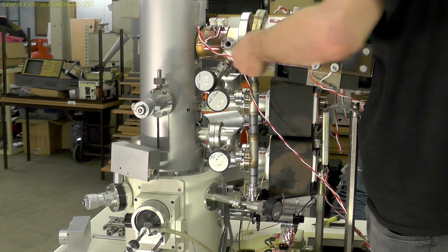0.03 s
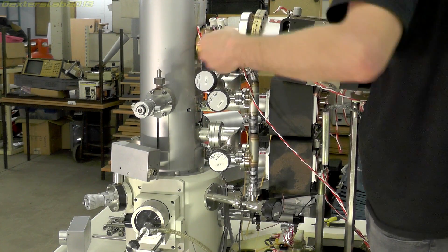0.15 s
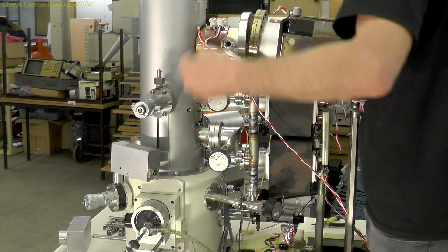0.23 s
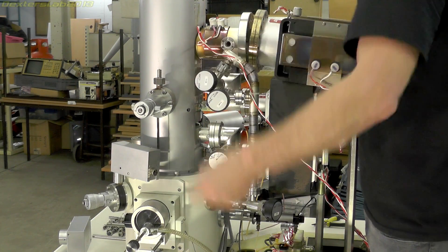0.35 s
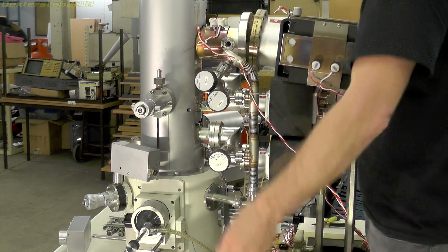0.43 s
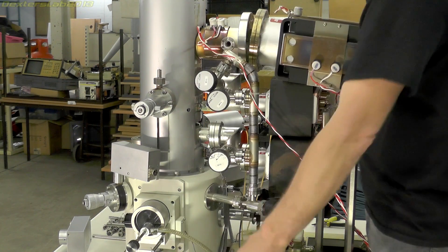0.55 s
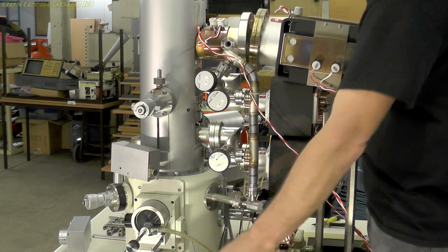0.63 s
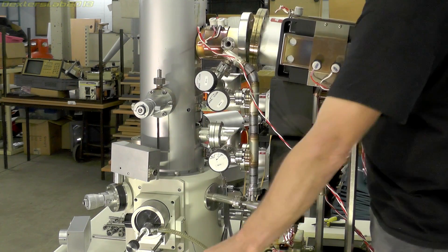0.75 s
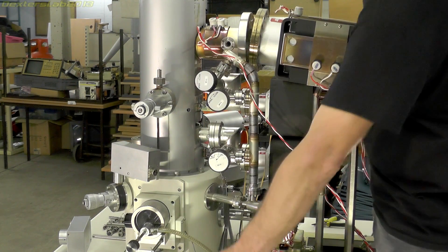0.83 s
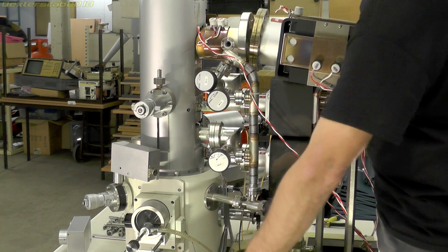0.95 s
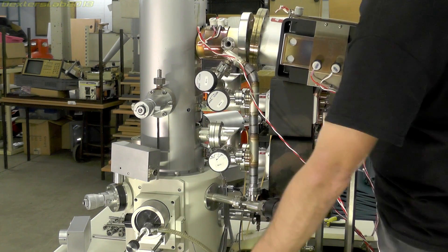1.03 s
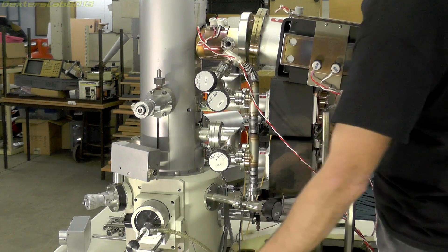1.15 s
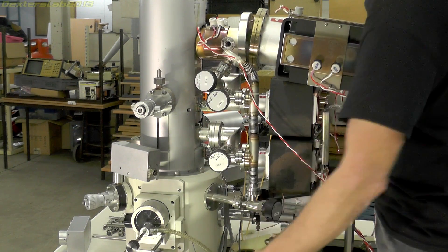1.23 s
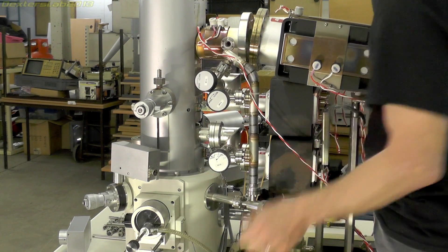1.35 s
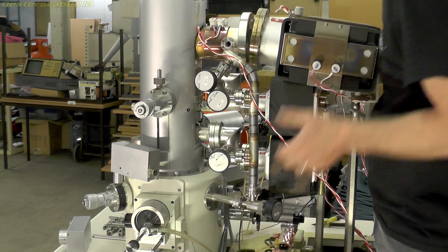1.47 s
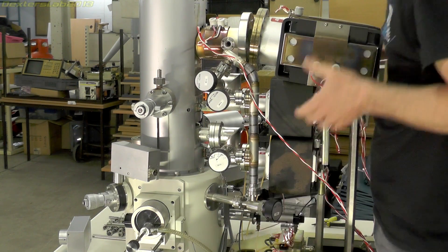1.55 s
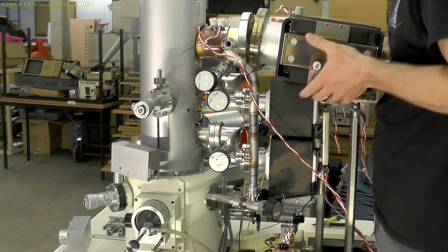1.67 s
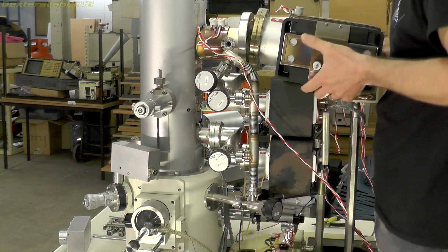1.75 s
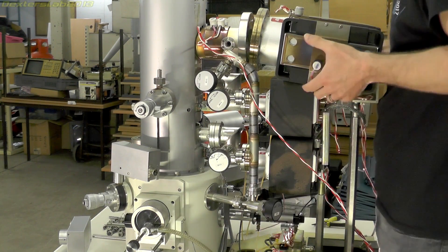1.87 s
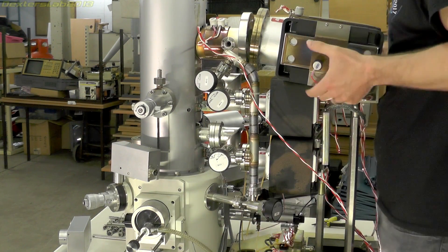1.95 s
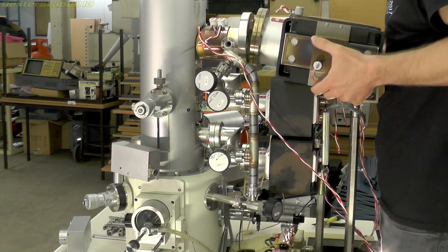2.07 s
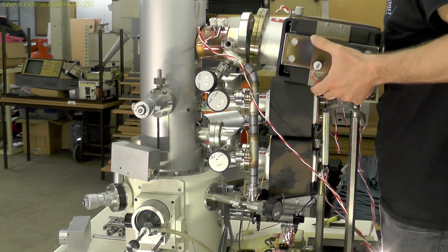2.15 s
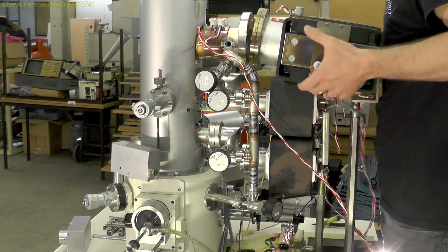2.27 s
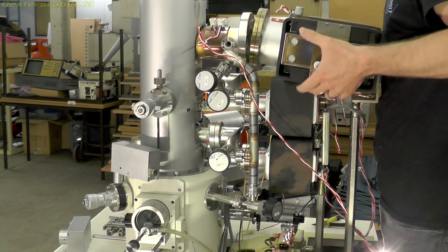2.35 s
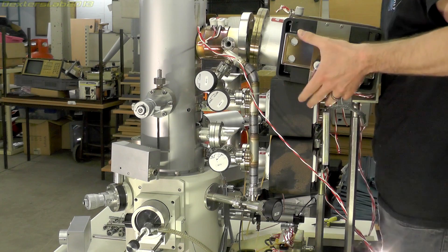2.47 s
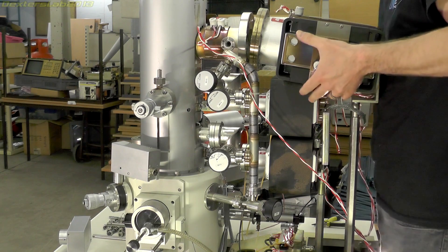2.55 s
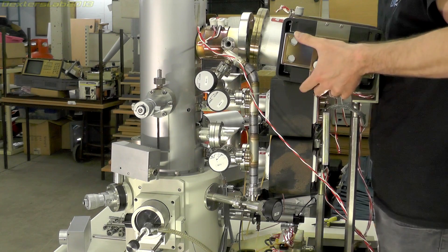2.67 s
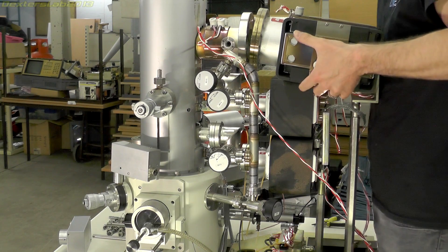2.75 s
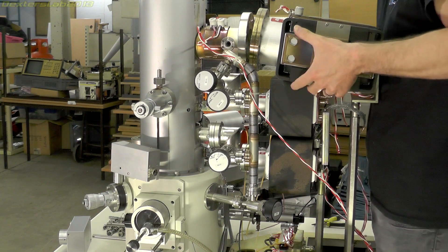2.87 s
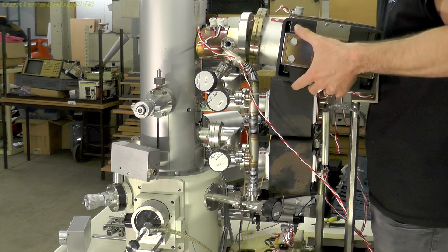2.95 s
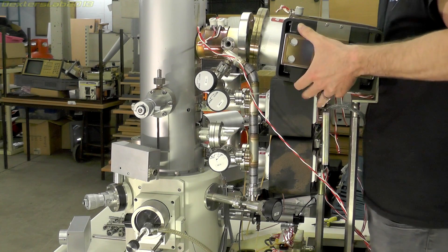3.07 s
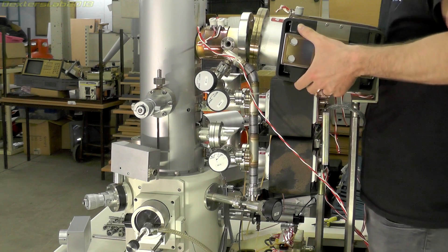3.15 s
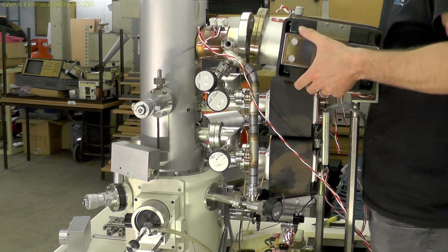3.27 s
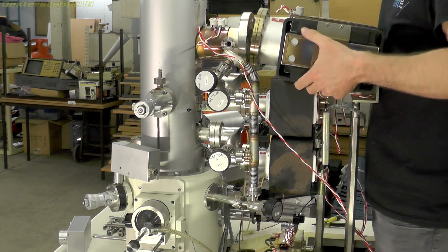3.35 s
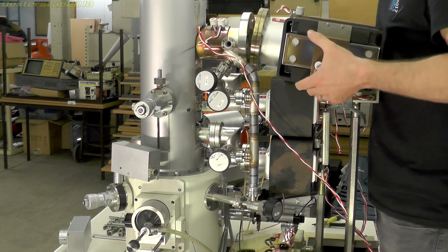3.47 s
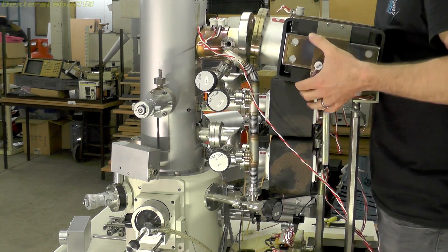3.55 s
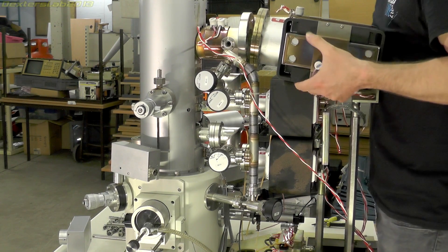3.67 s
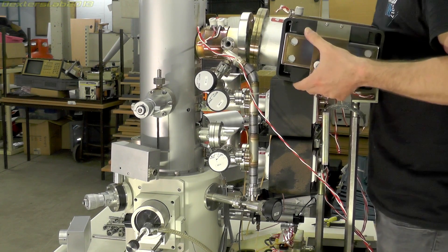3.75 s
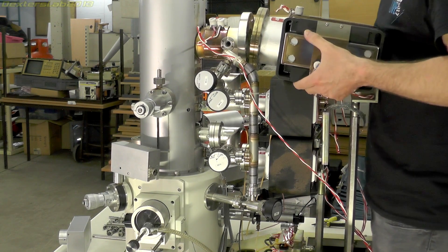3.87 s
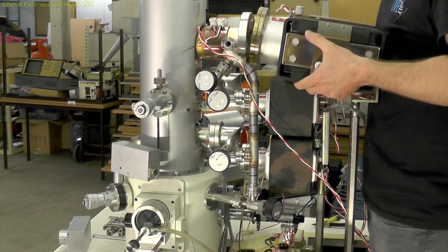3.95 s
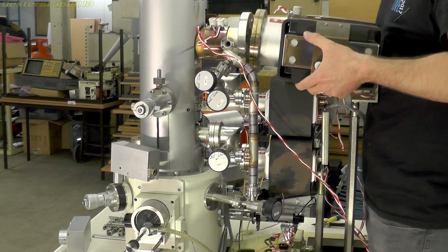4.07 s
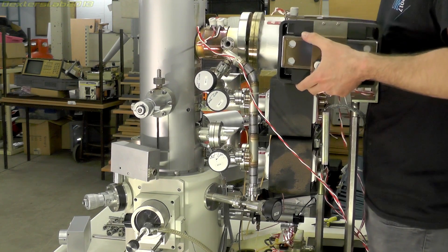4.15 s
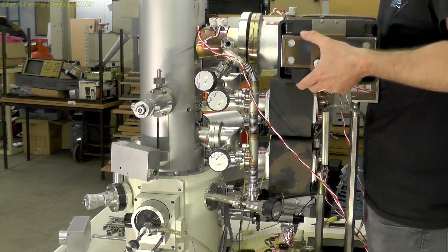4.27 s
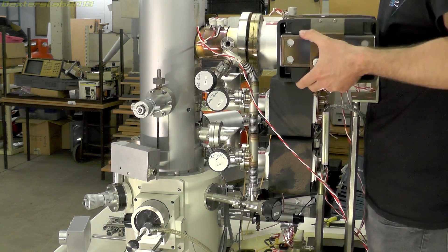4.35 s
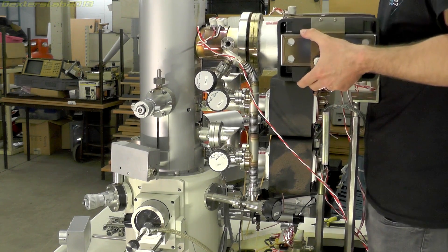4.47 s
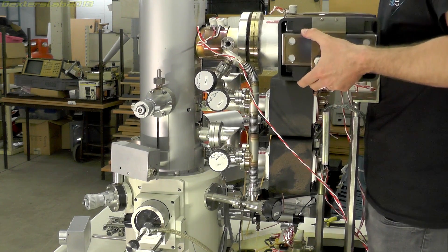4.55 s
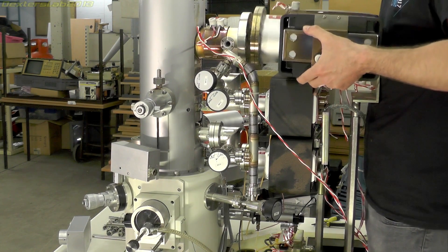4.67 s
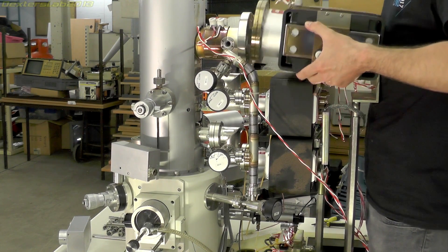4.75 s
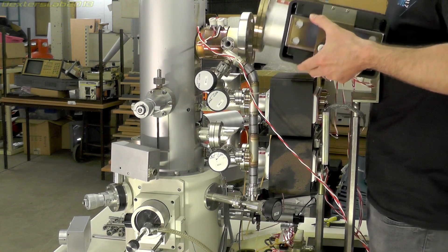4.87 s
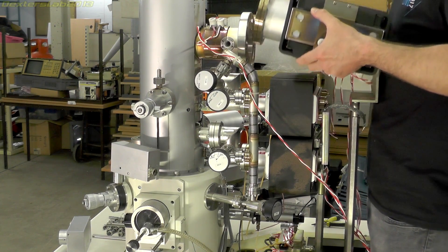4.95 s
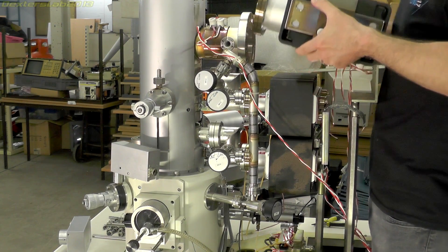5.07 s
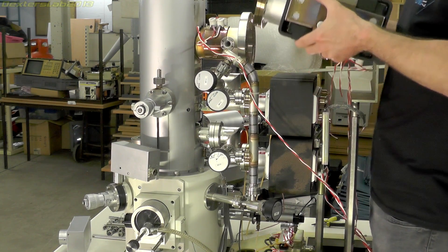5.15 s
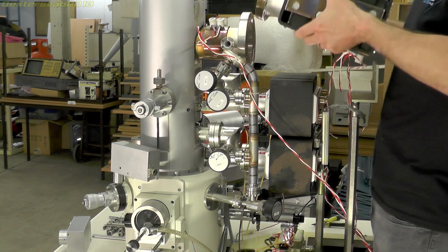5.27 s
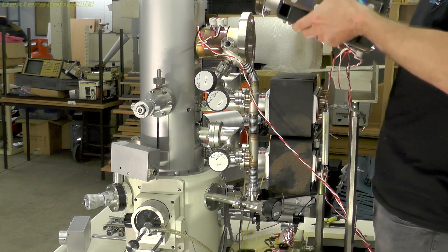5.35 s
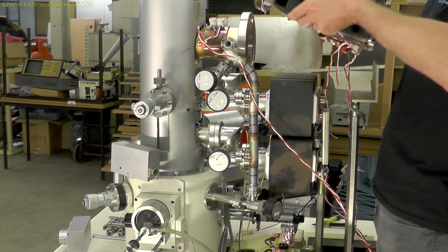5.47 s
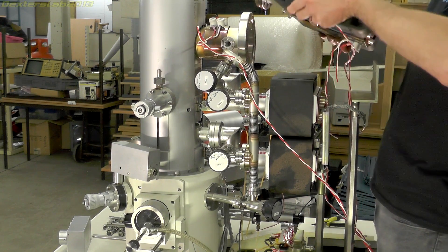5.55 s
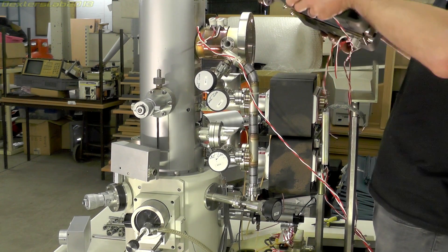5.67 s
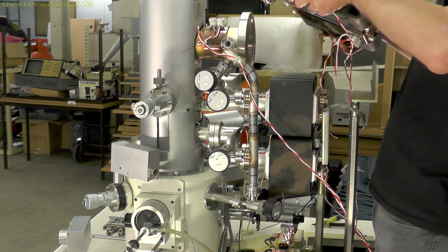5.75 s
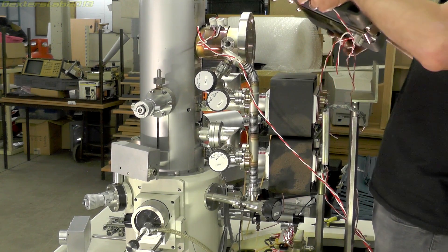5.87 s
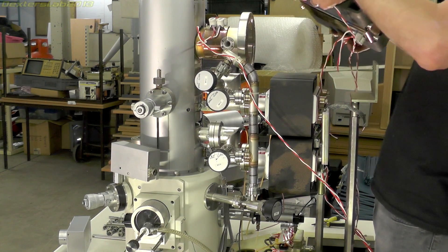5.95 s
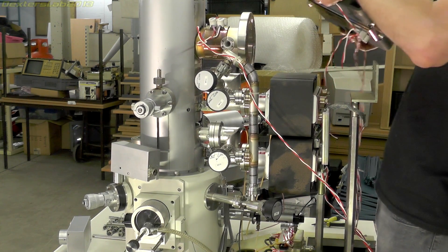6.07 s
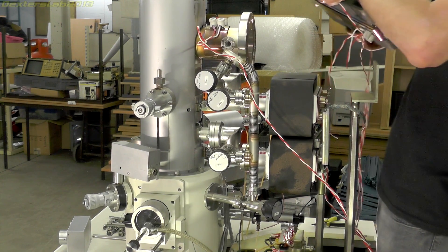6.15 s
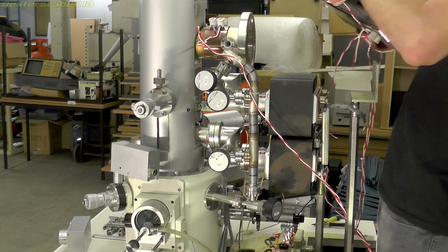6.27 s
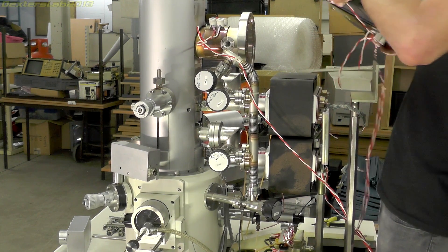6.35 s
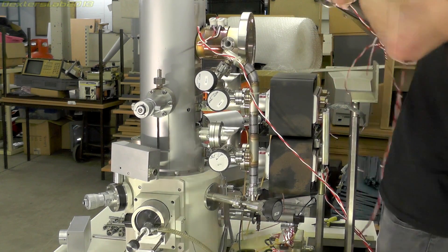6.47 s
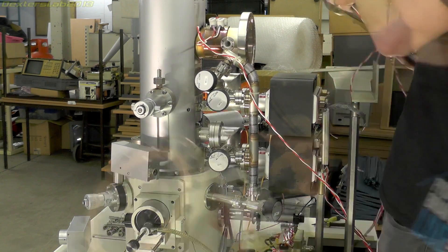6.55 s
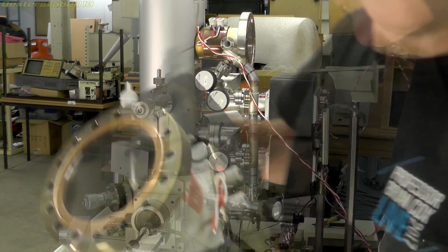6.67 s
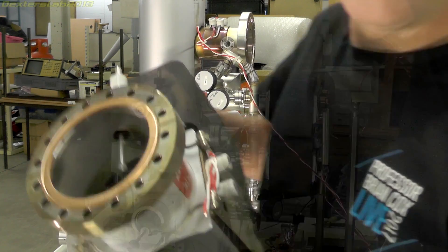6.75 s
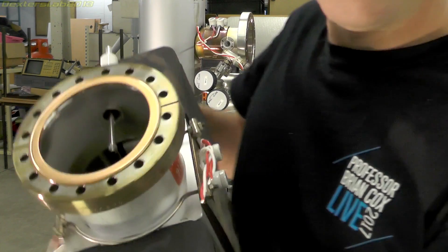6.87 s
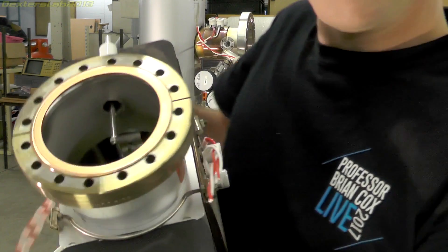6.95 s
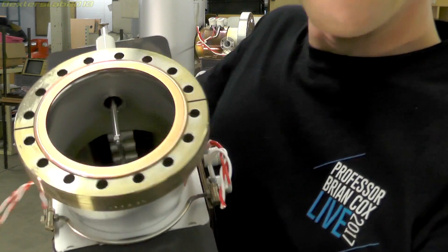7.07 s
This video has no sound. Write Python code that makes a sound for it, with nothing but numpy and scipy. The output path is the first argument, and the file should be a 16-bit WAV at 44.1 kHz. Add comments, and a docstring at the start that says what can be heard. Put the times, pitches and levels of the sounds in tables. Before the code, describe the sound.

A steel tool drops and rattles in rapid, weakening bounces. Quiet intermittent ticks, rubs and cloth rustles follow while heavy metal is worked loose. A sudden hard clang with dull quick knocks frees it, a small loose part pings very high several times, then a sharp clack rings thinly. Soft fan rumble and a roughly one-second hall tail surround everything, captured by one microphone.

```python
"""Large workshop, one microphone: a heavy steel vacuum pump is taken off an instrument over hum and
ventilation. First the fading ring of an earlier clink and a soft footfall; then a spanner clatters down, as
cracks and ringing modes. The pump ticks and scrapes as it is rocked: brief contacts and friction noise. Its
flange comes free with a clang and a judder, also struck modes, and a small loose steel part pings in one high
mode. Near the end a fitting drops with a sharp clack and rings thinly, and a few more ticks follow."""
import sys
import numpy as np
from scipy import signal
from scipy.fft import rfft, irfft, next_fast_len
from scipy.io import wavfile
from scipy.ndimage import uniform_filter1d

SR = 44100
rng = np.random.default_rng(int(sys.argv[2]) if len(sys.argv) > 2 else 0)


def wrap_up_sound(samples):
    """Save the sound to the file named by the first command line argument, as 16-bit audio."""
    columns = np.atleast_2d(samples).T
    # keep every value between -1 and 1, then stretch to whole-number steps
    tamed = np.clip(columns, -1, 1)
    steps = np.round(tamed * 32767).astype(np.int16)
    wavfile.write(sys.argv[1], SR, steps)


N = 313551  # length in samples

# The pump flange knocking on its seat. Each row: start in seconds, relative level in dB, tilt in dB per octave.
FLANGE_HITS = [(4.9895, -12, -1.5), (4.9985, -18, 1.5), (5.001, -14, 2), (5.125, -27, 5),
               (5.1487, -20.5, 1.5)]
# Colour of its crack. Each row: frequency in Hz, relative density in dB per Hz.
FLANGE_SPECTRUM = [(90, -47.5), (180, -40), (255, -11.5), (320, -6), (400, -4.5), (540, -2.5), (650, -3),
                   (790, -1.5), (920, -10.5), (1100, 3), (1450, 0), (2000, -2.5), (3100, -8.5),
                   (4600, -23.5), (6500, -29), (11000, -28.5), (15500, -41)]
# Its strong modes. Each row: frequency in Hz, relative level in dB, 60 dB decay time in seconds.
FLANGE_MODES = [(114.9, -39, 0.88), (259.2, -26, .3), (283.3, -27, 0.44), (323.5, -23, 0.24),
                (444, -24, 0.23), (550, -24.5, 0.4), (826, -10.5, 0.099), (922, -1.5, 0.042),
                (1423, -14, 0.12), (1860, -30, 0.055)]
# the freed pump judders in dull, evenly spaced knocks that die away
JUDDER_START_S, JUDDER_GAP_S, JUDDER_TILT_DB_PER_OCTAVE = 5.026, .051, -13.5
JUDDER_RELATIVE_DB, JUDDER_FADE_DB_PER_S = -25.5, 15.5


def flange_clang(hall):
    """Hard knocks and a fading judder excite the heavy flange's modes."""
    hits = list(FLANGE_HITS)
    for delay in JUDDER_GAP_S * np.arange(7):
        level_db = JUDDER_RELATIVE_DB - JUDDER_FADE_DB_PER_S * delay
        hits.append((JUDDER_START_S + delay, level_db, JUDDER_TILT_DB_PER_OCTAVE))
    return blows(hits, FLANGE_SPECTRUM, FLANGE_MODES, hall, crack_t60=0.045, crack_db=-2.5,
                 crack_wet_db=-2.0, modes_db=-2.5, modes_wet_db=-5.0)


# The spanner bouncing to rest, first end down.
# Each row: start in seconds, relative level in dB, treble tilt in dB per octave.
SPANNER_HITS = [(1.1064, -19, -2), (1.121, -12.5, 0.5), (1.194, -22, -2), (1.2192, -17.5, -2),
                (1.2643, -22.5, -3.5), (1.294, -19.5, 0), (1.326, -24.5, -2), (1.355, -21.5, -1),
                (1.4041, -22, 1), (1.4375, -23.5, -1.5), (1.461, -26.5, -0.5), (1.496, -26, -1)]
# Its crowd of short modes. Each row: frequency in Hz, relative density in dB per Hz.
SPANNER_SPECTRUM = [(140, -43), (200, -11), (300, -16), (700, -11.5), (1100, -7), (1900, -5), (3000, -2.5),
                    (3800, -3.5), (5200, -10.5), (6700, -27), (8800, -15), (11000, -22.5), (15500, -34)]
# Its strong modes. Each row: frequency in Hz, relative level in dB, 60 dB decay time in seconds.
SPANNER_MODES = [(1067, -22.5, 0.11), (1817, 4, 0.014), (1830, -21, 0.42), (2154, -7, 0.042),
                 (2584, -8.5, 0.037), (3430, -16, 0.18), (3460, -3.5, 0.038), (3890, -17, 0.081),
                 (4220, -19, 0.1)]
# its other end lands a moment later, softer and duller
REBOUND_MEAN_S, REBOUND_LOSS_DB, REBOUND_DULL_DB_PER_OCTAVE = .0115, 3.5, 2


def spanner_clatter(hall):
    """At every bounce one end lands and the other follows, both ringing the spanner's modes."""
    hits = list(SPANNER_HITS)
    for s, db, tilt_db in SPANNER_HITS:
        second_s = s + REBOUND_MEAN_S * rng.uniform(.85, 1.15)
        hits.append((second_s, db - REBOUND_LOSS_DB, tilt_db - REBOUND_DULL_DB_PER_OCTAVE))
    return blows(hits, SPANNER_SPECTRUM, SPANNER_MODES, hall, crack_t60=0.051, crack_db=-6,
                 crack_wet_db=-3.5, modes_db=-4.0, modes_wet_db=-7)


# The fitting dropping and settling.
# Each row: start in seconds, relative level in dB, treble tilt in dB per octave.
FITTING_HITS = [(6.114, -36.5, -6.5), (6.121, -16, 3), (6.1225, -18, -2.1), (6.49, -34.5, -3),
                (6.4935, -39, 7.5)]
# Colour of its crack. Each row: frequency in Hz, relative density in dB per Hz.
FITTING_SPECTRUM = [(180, -18), (350, -8.5), (580, -2), (900, -2.5), (1300, 0), (1850, 1), (2700, -3),
                    (3900, 1.5), (5200, -3), (6800, -14.5), (11000, -9.5), (15500, -19.5)]
# Its strong modes. Each row: frequency in Hz, relative level in dB, 60 dB decay time in seconds.
FITTING_MODES = [(1450, -11, 0.18), (1730, 0.5, 0.068), (2090, 8, 0.015), (3940, -23, 0.48),
                 (4200, -34, 0.82), (4800, -36, 0.37), (8560, -22, 0.11), (11400, -16.5, 0.081)]


def fitting_drop(hall):
    """The falling fitting clacks and rings its own modes."""
    return blows(FITTING_HITS, FITTING_SPECTRUM, FITTING_MODES, hall, crack_t60=0.031, crack_db=-2.0,
                 crack_wet_db=-2.0, modes_db=-7.0, modes_wet_db=-20)


def fitting_shimmer(level_db, centre_hz, spread_hz, t60, count):
    """The fitting's thin wall rings on in a cluster of close modes after its hardest blow."""
    out = np.zeros(N)
    hardest_s = max(FITTING_HITS, key=lambda hit: hit[1])[0]
    mode_gain = from_db(level_db) / np.sqrt(count)
    for offset in np.linspace(-1, 1, count) + rng.standard_normal(count) / count:
        sign = rng.choice([-1, 1])
        add(out, hardest_s, sign * mode_gain * ring(centre_hz + spread_hz * offset, t60))
    return out


# Small loose steel part touching its neighbour. Each row: start in seconds, ring level in dB.
PINGS = [(5.001, -33), (5.152, -41.5), (5.187, -37.5), (5.5172, -21), (5.599, -20.5), (5.652, -30),
         (5.6836, -21.5), (5.708, -20.5), (5.755, -24.5)]
PING_HZ, PING_T60_S = 7728, 0.29
PING_CLICK_DB = -9.5  # contact click against the ring
PING_JOLT_DB = -22  # ring set off by a spanner blow, against that blow


def pings(hall, click_t60):
    """The small part's one high mode rings at each touch, with a faint click; the bouncing spanner jolts it too."""
    swing, clicks = np.zeros((2, N))
    decay = fade(clock(), PING_T60_S)
    click_spectrum = [(2000, -11), (4000, -8.5), (9000, -1.0), (12500, -1), (15500, -15.5)]
    jolts = [(s, db + PING_JOLT_DB) for s, db, _ in SPANNER_HITS]
    for s, db in list(PINGS) + jolts:
        start = round(s * SR)
        # a new touch shows only where it exceeds the ring still sounding
        swing[start:] = np.maximum(swing[start:], from_db(db) * decay[:N - start])
        add(clicks, s, from_db(db + PING_CLICK_DB) * crack(click_spectrum, click_t60))
    phase = 2 * np.pi * PING_HZ * clock() + .25 * drift(60)
    tone = uniform_filter1d(swing, size=70) * np.sin(phase)
    return in_hall(tone, hall, wet_db=-9.5) + in_hall(clicks, hall, wet_db=-3)


# Clearest ticks as the pump is gripped and rocked.
# Each row: start in seconds, level in dB, treble tilt in dB per octave, ring frequency in Hz.
TICKS = [(0.78, -60, 0, 2120), (1.735, -39.5, 1, 1547), (1.978, -53.5, 0.5, 1560),
         (2.325, -43.5, 15.5, 12500), (2.33, -48.5, -3, 597), (2.353, -50.5, 17, 12950),
         (2.375, -44.5, 4.5, 1900), (2.396, -50.5, 4, 2020), (2.644, -42, 1, 3450), (2.65, -41, -0.5, 1900),
         (3.046, -49, 1, 1405), (3.144, -53, 9.5, 1560), (3.343, -44, 3.5, 1530), (3.793, -42, 0.5, 1520),
         (4.019, -44.5, -7.5, 678), (4.183, -44.5, -5, 686), (4.643, -46, -5.5, 1522),
         (4.645, -46.5, -7, 2230), (6.655, -44, -0.5, 2730), (6.919, -42.5, 2, 1140),
         (6.975, -38, -10, 1330)]
# Colour of a tick. Each row: frequency in Hz, relative density in dB per Hz.
TICK_SPECTRUM = [(150, -1.5), (400, 5), (900, 4.5), (1700, 8.5), (3500, 2.5), (6000, -13.5), (12000, -12.5),
                 (15500, -30)]
TICK_RING_DB, TICK_LOW_CUT_HZ = 5, 280  # ring against its tick


def ticks(hall, crack_t60, ring_t60, crack_wet_db, ring_wet_db):
    """Tiny slips at the flange, each with one brief ring and a crack without bass."""
    cracks, rings = np.zeros((2, N))
    for s, db, tilt_db, hz in list(TICKS) + faint_ticks(count=6):
        add(cracks, s, from_db(db) * crack(TICK_SPECTRUM, crack_t60, tilt_db))
        add(rings, s, from_db(db + TICK_RING_DB) * ring(hz, ring_t60))
    low_cut = signal.butter(2, TICK_LOW_CUT_HZ, "high", fs=SR, output="sos")
    cracks = signal.sosfilt(low_cut, cracks + 1e-18)
    return in_hall(cracks, hall, crack_wet_db) + in_hall(rings, hall, ring_wet_db)


# fainter ticks fall at random while the pump is in hand
GRIP_START_S, GRIP_END_S = 1.7, 4.6
FAINT_TICK_DB, FAINT_SPREAD_DB, FAINT_TILT_DB_PER_OCTAVE, FAINT_RING_HZ = -56.5, 2.5, 6.5, 1600


def faint_ticks(count):
    """Chance slips, one in each equal share of the time the pump is held."""
    slot = (GRIP_END_S - GRIP_START_S) / count
    rows = []
    for k in range(count):
        s = GRIP_START_S + slot * (k + rng.random())
        db = FAINT_TICK_DB + FAINT_SPREAD_DB * rng.uniform(-0.59, 1)
        rows.append((s, db, FAINT_TILT_DB_PER_OCTAVE, FAINT_RING_HZ * rng.uniform(0.88, 1.058)))
    return rows


# Bolts and washers touched lightly. Each row: start in seconds, frequency in Hz, level in dB.
CHIMES = [(0.003, 1317, -60), (0.067, 5690, -58), (2.213, 5860, -72.5), (2.325, 5920, -60.5),
          (5.808, 5500, -69.5)]
CHIME_T60_S = 0.25
# The fitting, lying free, rings on in lower modes.
# Each row: frequency in Hz, level in dB, 60 dB decay time in seconds.
SETTLE_MODES = [(1016, -54.5, 0.86), (1152, -62.5, 0.98), (1310, -52, 0.45), (3320, -57, 0.38)]
SETTLE_S = 6.494


def chimes():
    """Light touches on bolts, and the fitting as it settles, leave thin, long rings."""
    out = np.zeros(N)
    for s, hz, db in CHIMES:
        add(out, s, from_db(db) * ring(hz, CHIME_T60_S))
    for hz, db, t60 in SETTLE_MODES:
        add(out, SETTLE_S, from_db(db) * ring(hz, t60))
    return out


# After the first row, which is part of the fading opening clink, pushes that slide metal on metal. Each row:
# start in seconds, hold in seconds, level in dB.
SLIDES = [(0, 0.12, -67.5), (2.09, 0.16, -67.5), (2.32, 0.033, -56.5), (3.05, 1, -69),
          (4.015, 0.051, -55.5), (4.175, 0.11, -53), (4.32, 0.1, -58.5), (4.42, 0.15, -56.5),
          (6.55, 0.19, -60), (6.93, 0.033, -56)]
# Colour of the scrape. Each row: frequency in Hz, relative density in dB per Hz.
SLIDE_SPECTRUM = [(90, -4), (180, -5.5), (290, -11), (400, 1), (650, 0), (900, -3.5), (1350, -2.5),
                  (2200, -8), (3500, -21.5), (7000, -44), (15000, -46)]


def metal_slides():
    """Metal catches and rubs as the pump is pushed."""
    level = strokes(SLIDES, attack_s=0.0061, release_s=0.35, rest_db=-82)
    return friction(level, SLIDE_SPECTRUM, grains_per_s=180, grain_db=2.5, smooth_db=-5.5, jerk_db=4.5)


# After the first row, which is part of the fading opening clink, sleeves and wires brushing as the arms move.
# Each row: start in seconds, hold in seconds, level in dB.
RUSTLES = [(-.04, 0.064, -55.5), (.42, .15, -80), (2.06, 0.081, -64.5), (2.32, 0.041, -59.5),
           (2.88, 0.037, -64.5), (3.55, 0.093, -70), (4.07, 0.38, -65.5), (6.57, 0.07, -56.5),
           (7.03, 0.057, -65.5)]
# Colour of the rustle. Each row: frequency in Hz, relative density in dB per Hz.
RUSTLE_SPECTRUM = [(1000, 2), (2500, 3.5), (4500, 2), (7000, -6), (13000, -1.5), (15500, -11)]


def sleeve_rustles():
    """Cloth and wire brush in dense, uneven catches."""
    level = strokes(RUSTLES, attack_s=0.035, release_s=0.57, rest_db=-85.5)
    return friction(level, RUSTLE_SPECTRUM, grains_per_s=340, grain_db=8, smooth_db=0.5, jerk_db=4.0)


# Soft footfall; the end levels are held outside the rows. Each row: time in seconds, level in dB.
STEP_LEVEL = [(.48, -78), (.52, -69), (.555, -61), (.61, -68), (.72, -73)]


def footfall():
    """Dull noise swells and falls as the foot is set down."""
    spectrum = [(150, -12.0), (220, -1.0), (310, -9.0), (450, -15.5), (2000, -36.5), (8000, -63.0)]
    return level_curve(STEP_LEVEL) * colour(rng.standard_normal(N), spectrum)


# Slow throb of the ventilation fan, then mains lines. Each row: frequency in Hz, level in dB rms.
HUM = [(12.65, -52), (25.3, -66), (50, -66), (100, -80), (150, -76)]
# Colour of the ventilation. Each row: frequency in Hz, relative density in dB per Hz.
AIR_SPECTRUM = [(22, -1), (29, -1.5), (38, -6), (54, -4), (64, -11.5), (85, -14.5), (112, -10), (200, -26),
                (400, -31), (1000, -32), (3000, -40.5), (6000, -45.5), (15500, -45)]
AIR_DB = -62  # rms


def workshop():
    """Ventilation is coloured noise; the fan throb and mains hum are steady sines."""
    hum = np.zeros(N)
    for hz, db in HUM:
        hum += from_db(db) * np.sqrt(2) * np.sin(2 * np.pi * (hz * clock() + rng.random()))
    air = colour(rng.standard_normal(N + SR), AIR_SPECTRUM)[SR:]  # skip the filter's onset
    return hum + from_db(AIR_DB) * rms_one(air)


# Decay of the hall's tail. Each row: frequency in Hz, 60 dB decay time in seconds.
HALL_T60 = [(100, 1), (400, 0.8), (1000, 0.99), (3500, 0.92), (8000, 0.66), (15000, 0.13)]


def hall_response(near_db, near_t60, build_s):
    """Quick scatter from nearby machinery with the long tail of the hall; unit energy."""
    t = np.arange(3 * SR // 2) / SR
    white = rfft(rng.standard_normal(len(t)))
    hz = np.arange(len(t) // 2 + 1) * SR / len(t)
    edges = np.r_[0, np.geomspace(300, SR / 2, 28)]
    tail = np.zeros(len(t))
    # air and walls swallow the highest treble first
    for low, high in zip(edges, edges[1:]):
        band = irfft(white * ((hz >= low) & (hz < high)), len(t))
        tail += band * fade(t, at_hz(HALL_T60, (low + high) / 2))
    scatter = from_db(near_db) * rng.standard_normal(len(t)) * fade(t, near_t60)
    response = (tail + scatter) * (1 - np.exp(-t / build_s))
    return response / np.linalg.norm(response)


def in_hall(x, response, wet_db):
    """Direct sound plus reverberation at a given share of its power."""
    wet = rms_one(signal.fftconvolve(x, response)[:N])
    return x + from_db(wet_db) * np.std(x) * wet


def blows(hits, spectrum, modes, hall, crack_t60, crack_db, crack_wet_db, modes_db, modes_wet_db):
    """Every blow cracks and rings the body's modes; treble tilt brightens or dulls both."""
    cracks, rings = np.zeros((2, N))
    centre_hz = np.exp(np.mean(np.log(np.array(modes)[:, 0])))
    for s, db, tilt_db in hits:
        add(cracks, s, from_db(db + crack_db) * crack(spectrum, crack_t60, tilt_db))
        for hz, mode_db, t60 in modes:
            # each contact point drives the mode a little differently
            contact_point = rng.choice([-1, 1]) * from_db(1.5 * rng.standard_normal())
            tilt = tilt_db * np.log2(max(hz / centre_hz, 1))
            add(rings, s, contact_point * from_db(db + modes_db + mode_db + tilt) * ring(hz, t60))
    return in_hall(cracks, hall, crack_wet_db) + in_hall(rings, hall, modes_wet_db)


def ring(hz, t60):
    """One struck mode, swelling within its first cycle."""
    t = np.arange(int(1.2 * t60 * SR) + 2) / SR
    return np.sin(2 * np.pi * hz * t) * fade(t, t60) * (1 - np.exp(-hz * t))


def crack(spectrum, t60, tilt_db=0):
    """A crowd of close, quickly damped modes set off by one contact, made as fading coloured noise."""
    t = np.arange(SR // 5) / SR
    rise = 1 - np.exp(-(t + 1 / SR) / (t60 / 50))
    return colour(rng.choice([-1, 1], len(t)) * fade(t, t60) * rise, spectrum, tilt_db)


def friction(level, spectrum, grains_per_s, grain_db, smooth_db, jerk_db):
    """Many small catches of uneven size on a bed of smooth rubbing; the motion comes in short jerks."""
    hits = rng.random(N) < grains_per_s / SR
    sizes = from_db(grain_db * np.minimum(rng.exponential(1, N), 4))
    catches = rms_one(hits * sizes * rng.choice([-1, 1], N))
    rubbing = from_db(smooth_db) * rng.standard_normal(N)
    force = (catches + rubbing) * from_db(jerk_db * drift(45))
    return level * colour(rms_one(force), spectrum)


def strokes(rows, attack_s, release_s, rest_db):
    """Each movement swells, holds and dies away (60 dB in release_s), above a faint resting level."""
    t, power = clock(), from_db(rest_db) ** 2
    for start, hold, db in rows:
        swell = np.clip((t - start) / attack_s, 0, 1)
        release = fade(np.maximum(t - start - hold, 0), release_s)
        power = power + (from_db(db) * swell * release) ** 2
    return np.sqrt(power)


def colour(x, spectrum, tilt_db=0):
    """Causal filter of unit power gain with the given spectrum, falling away below its first point."""
    size = 2 * next_fast_len(len(x) // 2 + 2048)
    hz = np.arange(size // 2 + 1) * SR / size + 1
    lowest_hz = spectrum[0][0]
    tilt = tilt_db * np.log2(np.maximum(hz, lowest_hz))
    gain = from_db(at_hz(spectrum, hz) + tilt) / np.sqrt(1 + (.5 * lowest_hz / hz) ** 4)
    # folding the cepstrum forward gives minimum phase
    cepstrum = irfft(np.log(rms_one(gain) + 1e-6))
    cepstrum[1:size // 2] *= 2
    cepstrum[size // 2 + 1:] = 0
    return irfft(rfft(x, size) * np.exp(rfft(cepstrum)))[:len(x)]


def drift(rate):
    """Slow random wander of spread about 1, with rate new targets per second."""
    return np.interp(clock() * rate, np.arange(N // 20), rng.standard_normal(N // 20))


def from_db(db):
    """Decibels to gain."""
    return 10 ** (np.asarray(db) / 20)


def rms_one(x):
    """Scale to unit power."""
    return x / np.sqrt(np.mean(x ** 2) + 1e-20)


def clock():
    """Time of every sample in seconds."""
    return np.arange(N) / SR


def level_curve(rows):
    """Gain that follows (s, dB) rows."""
    return from_db(np.interp(clock(), *np.transpose(rows)))


def at_hz(points, hz):
    """Read a table on a log-frequency axis."""
    f, value = np.transpose(points)
    return np.interp(np.log(hz + 1), np.log(f), value)


def fade(t, t60):
    """Free decay, 60 dB in t60 seconds."""
    return np.exp(-np.log(1000) * t / t60)


def add(out, s, sound):
    """Mix a sound in at time s."""
    start = max(round(s * SR), 0)
    out[start:start + len(sound)] += sound[:N - start]


def scene():
    """All sources reach one microphone, heard alike in both channels."""
    hall = hall_response(near_db=1, near_t60=0.11, build_s=0.0061)
    struck = flange_clang(hall) + spanner_clatter(hall) + fitting_drop(hall)
    small_parts = pings(hall, click_t60=0.0063)
    handling = ticks(hall, crack_t60=0.041, ring_t60=0.022, crack_wet_db=-1.5, ring_wet_db=-13.5)
    thin_rings = fitting_shimmer(level_db=-36.5, centre_hz=3970, spread_hz=280, t60=0.47, count=22) + chimes()
    movement = in_hall(metal_slides() + sleeve_rustles() + thin_rings, hall, wet_db=-1.0)
    mono = struck + small_parts + handling + movement + footfall() + workshop()
    return np.array([mono, mono])


def record(dry):
    """A steep low-pass cuts the top above 15.9 kHz."""
    low_pass = signal.ellip(10, .1, 90, 15900, fs=SR, output="sos")  # 0.1 dB ripple, 90 dB rejection
    return signal.sosfilt(low_pass, dry)


dry = scene()
out = record(dry)
wrap_up_sound(out)
```